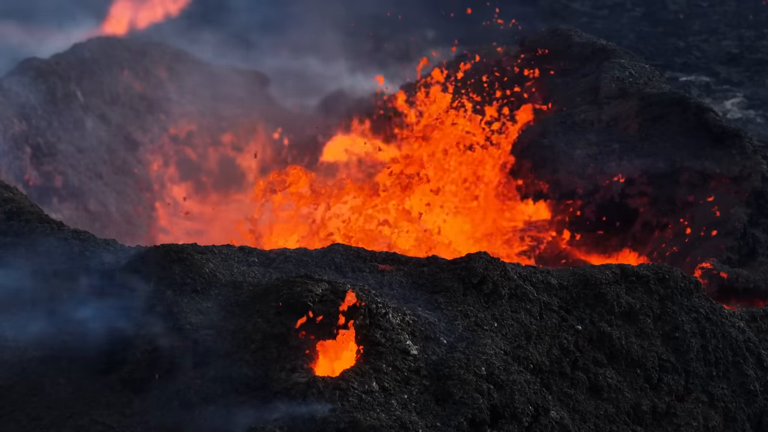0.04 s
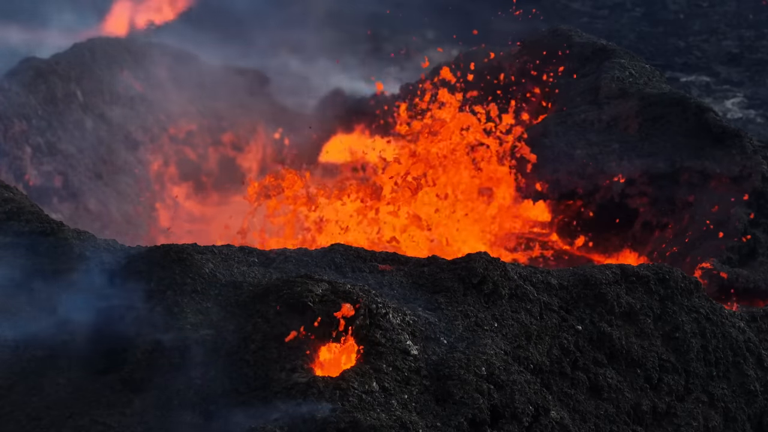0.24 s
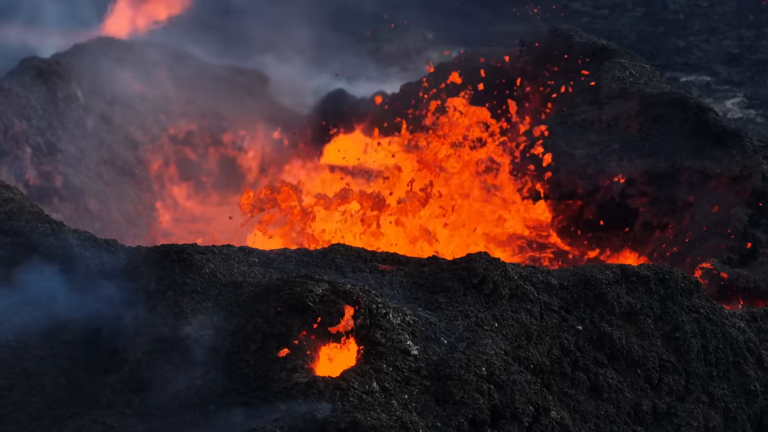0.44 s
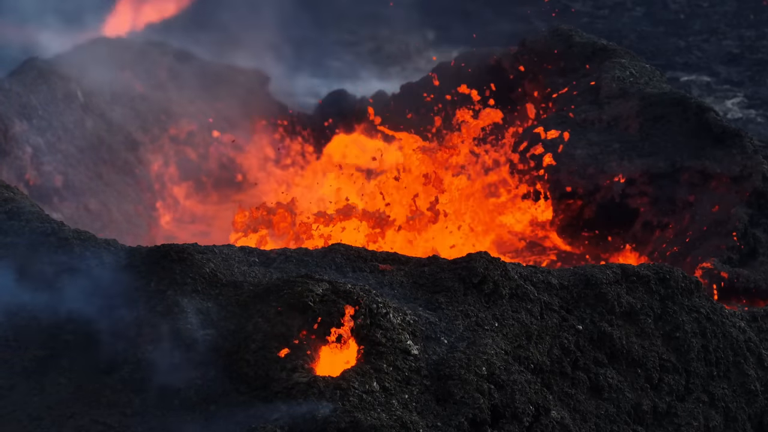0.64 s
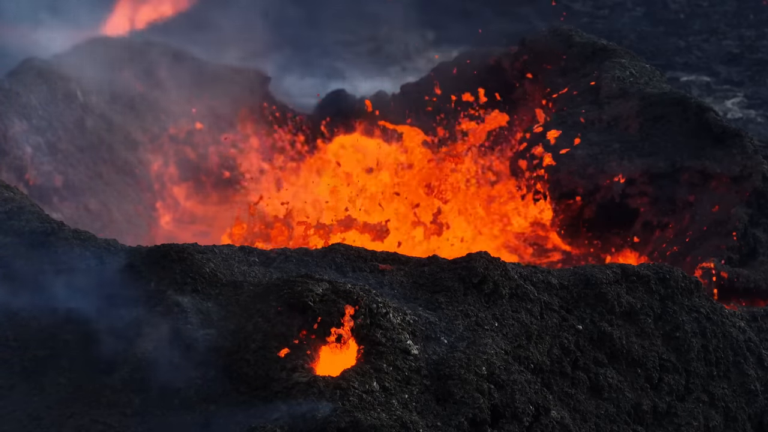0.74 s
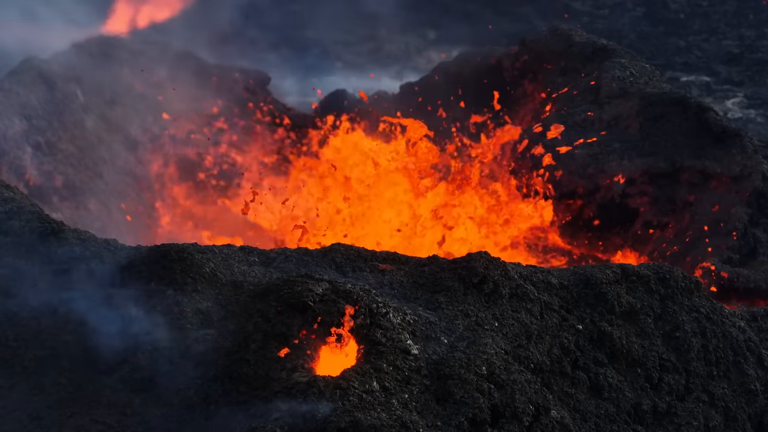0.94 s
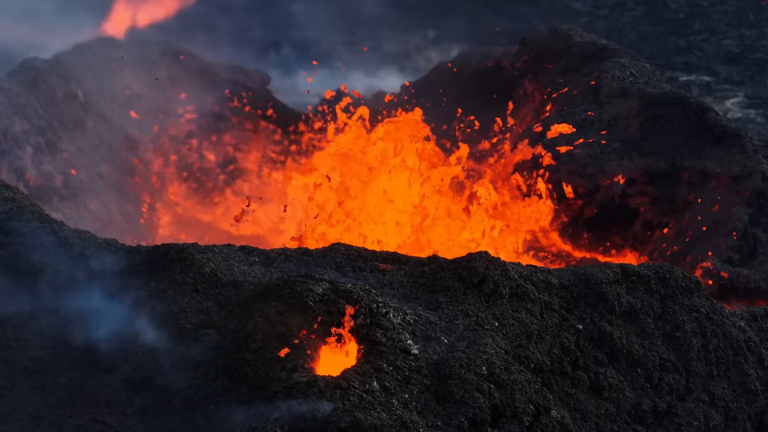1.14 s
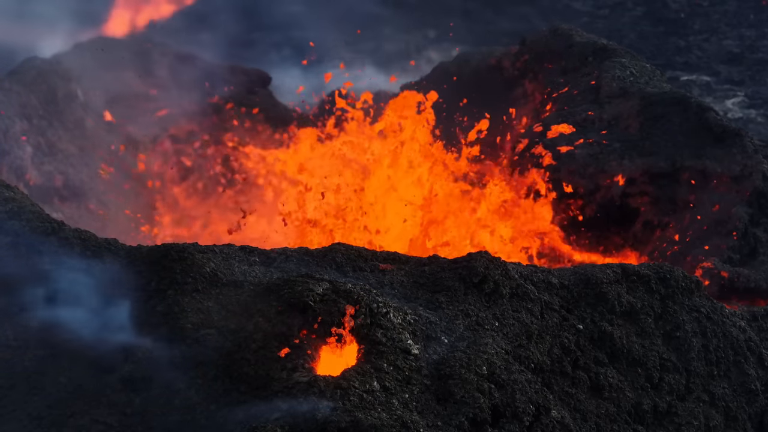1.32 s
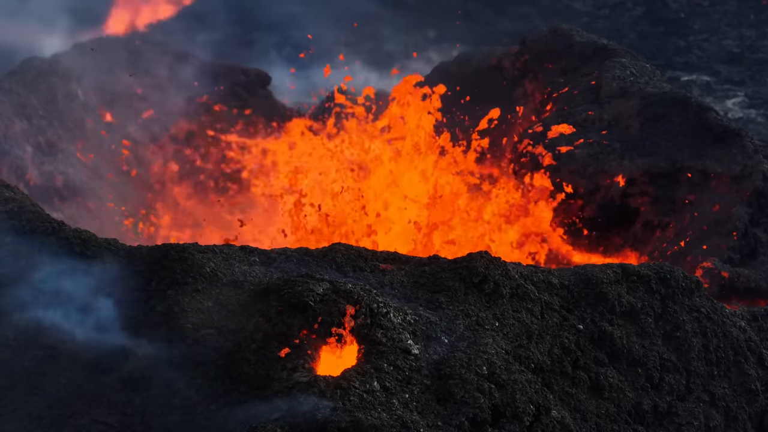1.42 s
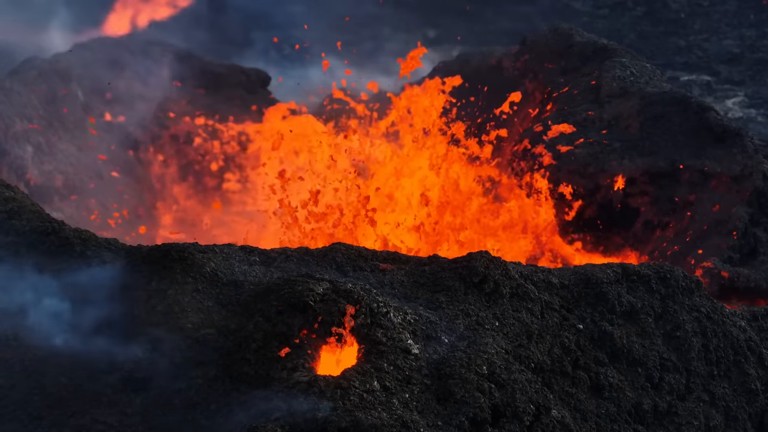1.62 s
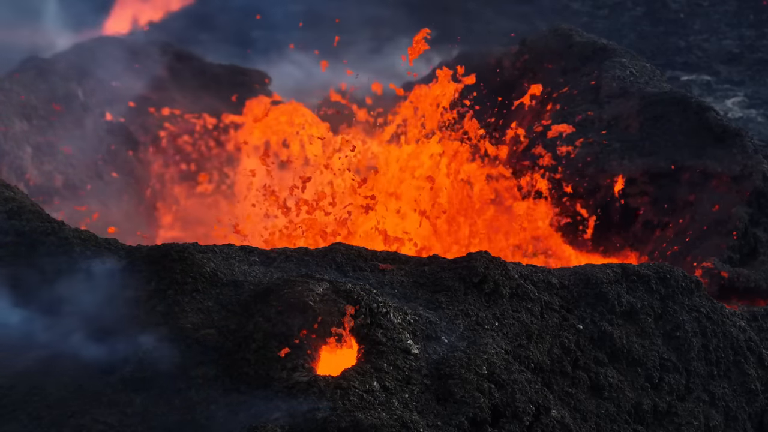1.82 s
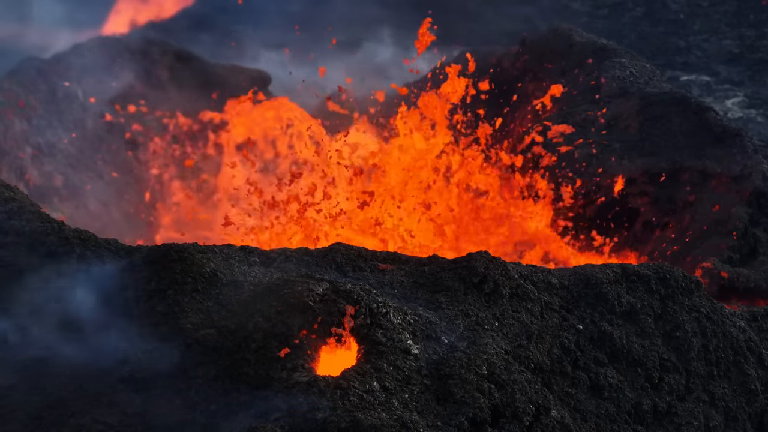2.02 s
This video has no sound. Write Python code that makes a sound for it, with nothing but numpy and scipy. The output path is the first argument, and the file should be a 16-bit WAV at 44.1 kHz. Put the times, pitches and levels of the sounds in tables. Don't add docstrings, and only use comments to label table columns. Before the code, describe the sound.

Surging lava roar over heavy low rumble, strongest around the middle, then easing. Blunt gas bursts and brief splashes punctuate it, with fine hiss to the right and crisp cinder clicks near the outdoor stereo camera microphone.

```python
import sys
import numpy as np
from scipy import signal
from scipy.io import wavfile
from scipy.ndimage import uniform_filter1d

SR = 44100
rng = np.random.default_rng(int(sys.argv[2]) if len(sys.argv) > 2 else 0)


def persist_wave(psi):
    counts = np.round(np.clip(psi, -1, 1) * 32767).astype(np.int16)
    wavfile.write(sys.argv[1], SR, np.atleast_2d(counts).T)


def volts_from_db(level):
    exponent = np.asarray(level, float) / 20
    return 10 ** exponent


N = 91022


def unit_rms(x):
    return x / np.sqrt(np.mean(x ** 2) + 1e-20)


def read_spectrum(points, hz):
    f, value = np.transpose(points)
    return np.interp(np.log(hz + 1), np.log(f + 1), value)


def read_curves(table):
    s, *columns = np.transpose(table)
    return [np.interp(np.arange(N) / SR, s, column) for column in columns]


def sided(level_db, side_db):
    ratio = volts_from_db(side_db)
    return 2 * volts_from_db(level_db) * np.array([ratio, np.ones_like(ratio)]) / (1 + ratio)


# frequency in Hz, likeness from 0 to 1.
LIKENESS = [(30, .88), (100, .9), (250, .77), (600, .6), (1400, .5), (3000, .1), (6000, 0)]


def turbulence(colour, size, patchy_db, flicker_db):
    frames = 4 * N // size + 5
    hz = np.fft.rfftfreq(size, 1 / SR)
    a, b, c, d, p, q = rng.standard_normal((frames, len(hz), 6)).T
    p = uniform_filter1d(p, size=size // 80, axis=0)
    patches = unit_rms(uniform_filter1d(p, size=8192 // size, axis=1))
    q = uniform_filter1d(q, size=size // 5, axis=0)
    flicker = unit_rms(uniform_filter1d(q, size=3, axis=1))
    same = np.clip(read_spectrum(LIKENESS, hz), -1, 1)[:, None]
    left = a + 1j * b
    right = same * left + np.sqrt(1 - same ** 2) * (c + 1j * d)
    level_db = read_spectrum(colour, hz)[:, None] + patchy_db * patches + flicker_db * flicker
    spectra = np.array([left, right]) * volts_from_db(level_db)
    return unit_rms(signal.istft(spectra, nperseg=size, noverlap=3 * size // 4)[1][:, :N])


# start in seconds, heave in dB, heave side L-R in dB, froth in dB,
# froth side L-R in dB.
SURGES = [(0, -15, 11.5, -24, 9), (.13, -17.5, 1.5, -25, 5.5), (.21, -17, -6.5, -30.5, -2.5),
          (.36, -14.5, -7.5, -31.5, -4), (.51, -11.5, -8, -26.5, -8.5), (.61, -18, -12, -29.5, -6.5),
          (.72, -12.5, -9.5, -26.5, -6.5), (.85, -13, -8, -27, -5), (.96, -9, -5.5, -23.5, -2),
          (1.07, -13, -1, -22.5, 2.5), (1.19, -10, -2.5, -25, 1), (1.31, -16.5, 2, -23.5, 3),
          (1.4, -13.5, 3.5, -25, 6), (1.53, -16.5, 3.5, -29.5, 6.5), (1.63, -17, 4.5, -26, 6.5),
          (1.72, -19, -2, -31.5, 0.5), (1.86, -20.5, -4, -34.5, 0), (2.06, -20, -1, -34, 2)]


def surges():
    return read_curves(SURGES)


# centre in seconds, rise in dB, half length in seconds.
SPLASHES = [(0.13, 0.5, 0.012), (0.395, 1, .02), (0.514, 1.5, 0.022), (0.723, 4.5, 0.013), (0.816, 3, .015),
            (0.883, 4, 0.0065), (1.02, -1, 0.014), (1.096, -1, 0.022), (1.182, 3, 0.031),
            (1.21, 2.5, 0.009), (1.321, 1, .02), (1.552, 2.5, 0.022), (1.65, 2, .02), (1.826, 3.5, 0.036)]


def splashes():
    t = np.arange(N) / SR
    return sum(db * np.exp(-((t - at) / half_s) ** 2) for at, db, half_s in SPLASHES)


# frequency in Hz, density in dB per Hz.
RUMBLE = [(12, -15), (25, -7), (40, 1), (75, -2), (130, -8.5), (240, -12.5), (330, -27), (2000, -110)]


def rumble(heave_db, side_db):
    return sided(heave_db, side_db) * turbulence(RUMBLE, size=4096, patchy_db=-0.46, flicker_db=0.03)


# frequency in Hz, density in dB per Hz.
ROAR = [(50, -14), (130, 2), (450, -2), (1400, -10), (2600, -18.5), (4400, -24.5), (7000, -33),
        (16000, -66)]
ROAR_DB, LEFT_LAG_S = 4, .0001


def roar(froth_db, side_db):
    left, right = sided(froth_db + ROAR_DB, side_db) * turbulence(ROAR, size=512, patchy_db=0.56, flicker_db=0.94)
    return np.array([np.roll(left, round(LEFT_LAG_S * SR)), right])


# frequency in Hz, density in dB per Hz.
HAZE = [(600, -32), (2000, -3.5), (3300, -1.5), (4700, 0), (6300, -5), (9500, -8), (12500, -13.5),
        (16000, -17.5)]
# time in seconds, haze above its mean in dB, side L-R in dB.
SPATTER = [(0, 3.5, -4), (.12, 1, -12), (.25, 3.5, -16), (.38, 1.5, -12.5), (.52, 1.5, -16), (.64, 3, -11),
           (.76, 3, -15), (.9, 1, -16), (1.05, 2.7, -13.5), (1.175, 4, -8.5), (1.25, 0.5, -12),
           (1.36, 0.5, -8), (1.5, 1.5, -8), (1.62, -3, -18), (1.76, 0, -12), (1.88, -1.5, -9),
           (2.06, 0.5, -12)]
HAZE_DB, HAZE_FOLLOWS = -39.5, 0.26


def haze(froth_db):
    density_db, side_db = read_curves(SPATTER)
    level_db = HAZE_DB + density_db + HAZE_FOLLOWS * (froth_db - froth_db.mean())
    return sided(level_db, side_db) * turbulence(HAZE, size=256, patchy_db=1.4, flicker_db=0.7)


def fountain():
    heave_db, heave_side_db, froth_db, froth_side_db = surges()
    froth_db = froth_db + splashes()
    return rumble(heave_db, heave_side_db) + roar(froth_db, froth_side_db) + haze(froth_db)


RING_CYCLES, SNAP_DB = 9, -3
BOUNCE_S, BOUNCE_DB = .00058, -3
RATTLE_DB, RATTLE_T60_S = -10, .007


def tick(hz, noise):
    t = np.arange(len(noise)) / SR
    w = 2 * np.pi * hz
    snap = np.exp(-w * t) - .4 * np.exp(-.4 * w * t)
    ring = np.sin(w * t) * volts_from_db(-60 * t * hz / RING_CYCLES)
    ring = ring + volts_from_db(SNAP_DB) * snap / abs(snap).max()
    bounce = volts_from_db(BOUNCE_DB) * np.interp(t - BOUNCE_S, t, ring, left=0)
    resonance = [1, -1.6 * np.cos(w / SR), .64]
    rattle = unit_rms(signal.lfilter([1], resonance, np.diff(noise, prepend=0)))
    return ring + bounce + rattle * volts_from_db(RATTLE_DB - 60 * t / RATTLE_T60_S)


GRIT_PER_S, GRIT_DB, GRIT_SPREAD_DB = 72, -45, 7


def grit():
    size = volts_from_db(GRIT_DB + GRIT_SPREAD_DB * np.minimum(rng.exponential(1, (2, N)), 2))
    hits = size * (rng.random((2, N)) < GRIT_PER_S / SR) * volts_from_db([[-3.5], [3.5]])
    kind = rng.integers(0, 12, (2, N))
    out = np.zeros((2, N))
    for k, hz in enumerate(np.geomspace(2500, 11000, num=12)):
        sound = tick(hz, rng.standard_normal(512))
        out += signal.oaconvolve(hits * (kind == k), sound[None])[:, :N]
    return out


# peak time in seconds, peak in dB, side L-R in dB, pitch in Hz.
LOW_SWELLS = [(0.069, -13, -4, 83), (0.119, -12, 4, 41.4), (0.291, -15, -7, 59), (0.459, -12, -13, 61.7),
              (.52, -19, -8, 35.3), (0.692, -17, -12, 75), (1.0, -20, 3, 89), (1.069, -6.5, -6.5, 45.2),
              (1.139, -7, 0, 75), (1.202, -15, -13, 55), (1.27, -14, -2, 75), (1.647, -10, 3, 230),
              (.25, -11, -6, 89), (.3, -19, -9, 119), (0.528, -25, -2, 125), (0.631, -15, -12, 56.3),
              (0.819, -14, -8, 85), (0.898, -18, -7, 80.5), (.955, -26, -10, 70), (1.03, -10, 6, 120),
              (1.316, -5.5, -2, 97), (1.401, -11, 2, 149), (1.441, -15, 3, 67), (1.558, -10.5, 1, 46.4),
              (1.663, -11, 6, 92), (1.77, -18, -20, 60), (1.862, -17, -4.5, 59.7)]
SWELL_CYCLES, GLIDE_PER_CYCLE = 0.81, 0.067


def low_swells():
    t = np.arange(N) / SR
    out = np.zeros((2, N))
    for s, db, side_db, hz in LOW_SWELLS:
        cycles = (t - s) * hz
        swell = np.exp(-(cycles / SWELL_CYCLES) ** 2)
        turns = cycles + GLIDE_PER_CYCLE * cycles ** 2 / 2 + rng.random()
        out += sided(db, side_db)[:, None] * swell * np.cos(2 * np.pi * turns)
    return out


# start in seconds, peak in dB, side L-R in dB, pitch in Hz.
CINDERS = [(.1014, -29, -10, 10000), (.1618, -31, 12, 10100), (.2489, -20, 8, 5800), (.2647, -28, 12, 6000),
           (.2886, -28, 12, 8500), (.4347, -23, 3, 12000), (.5209, -34, 12, 8800),
           (.6572, -11.5, -7, 10900), (.6602, -27, -5, 10700), (.6953, -29, -4, 9300),
           (.7179, -30, 12, 8100), (.7431, -30, 12, 9700), (.7663, -30, 12, 12200), (.8517, -31, 12, 8100),
           (.8775, -30, 6, 13500), (.9385, -30, 5, 9500), (.9474, -20, -16, 12000),
           (1.526, -30, -10, 12000), (1.5488, -31, -10, 9700), (1.6503, -20.5, -14, 8000),
           (1.6534, -25, -9, 9500), (1.6942, -12.5, -16, 4800), (1.7022, -36, 12, 13100),
           (1.7297, -26, -3, 7000), (1.7721, -15, -19, 7000), (1.7772, -18, -14, 5800),
           (1.7929, -13, -12, 4800), (1.8117, -30, -12, 8000), (1.8402, -31, 12, 9400),
           (1.864, -30, -6, 5000), (2.042, -36, 12, 11700)]


def cinders():
    out = np.zeros((2, N + 600))
    for s, db, side_db, hz in CINDERS:
        at = round(s * SR)
        gains = volts_from_db(db + np.minimum([[side_db], [-side_db]], 0))
        out[:, at:at + 512] += gains * tick(hz, rng.standard_normal(512))
    return out[:, :N]


def scene():
    return fountain() + grit() + low_swells() + cinders()


def top_cut(x):
    return signal.sosfilt(signal.butter(12, 15800, fs=SR, output="sos"), x)


CEILING, EDGE_HZ = 0.71, 15700


def record(dry):
    soft = CEILING * np.tanh(dry / CEILING)
    edge = signal.firwin(numtaps=255, cutoff=EDGE_HZ, window=("kaiser", 9), fs=SR)
    mix = signal.oaconvolve(soft, edge[None], "same")
    return top_cut(mix)


dry = scene()
out = record(dry)
persist_wave(out)
```